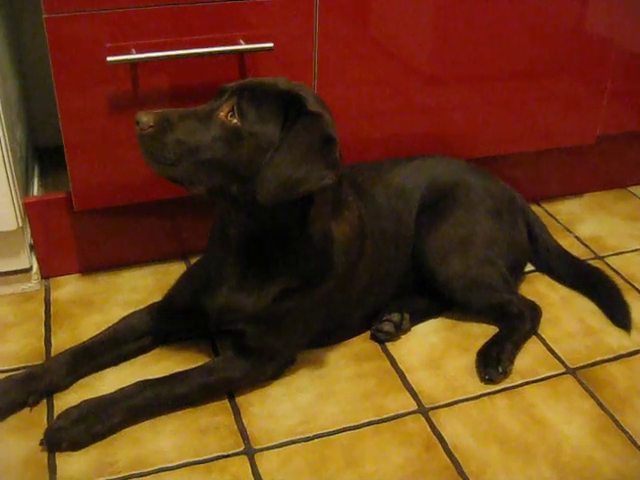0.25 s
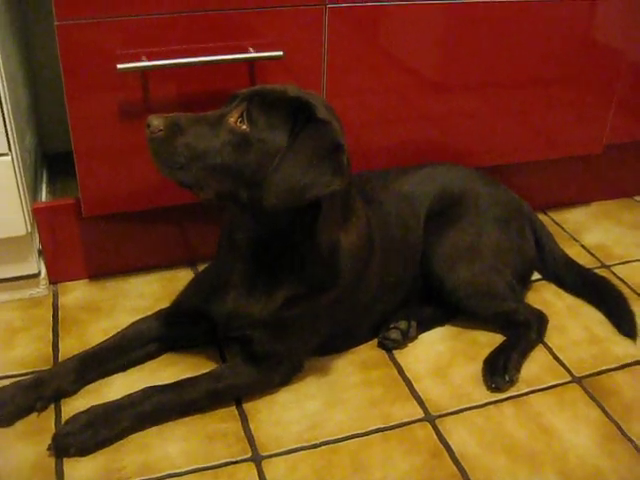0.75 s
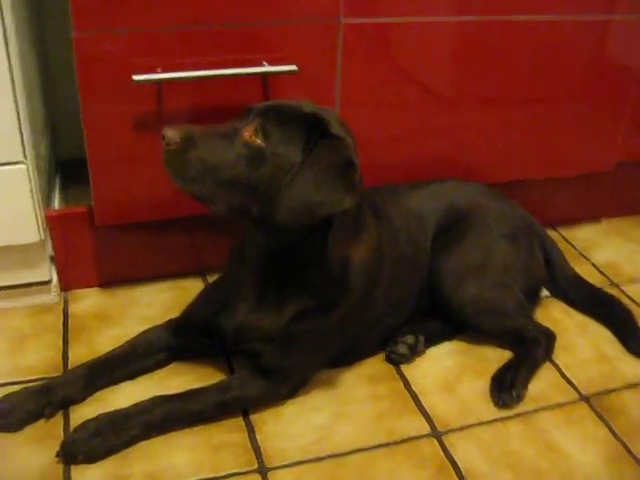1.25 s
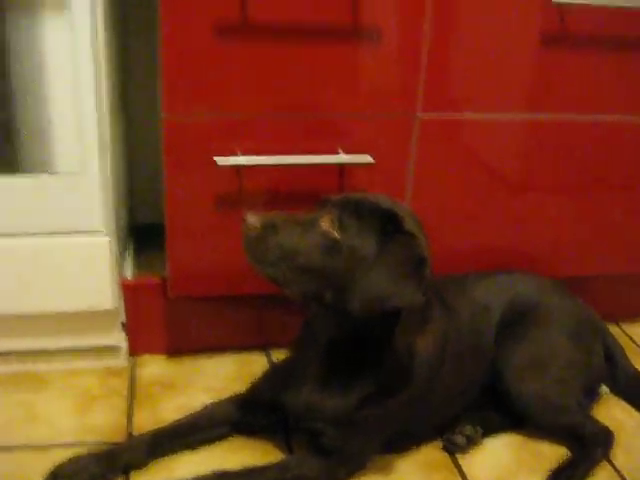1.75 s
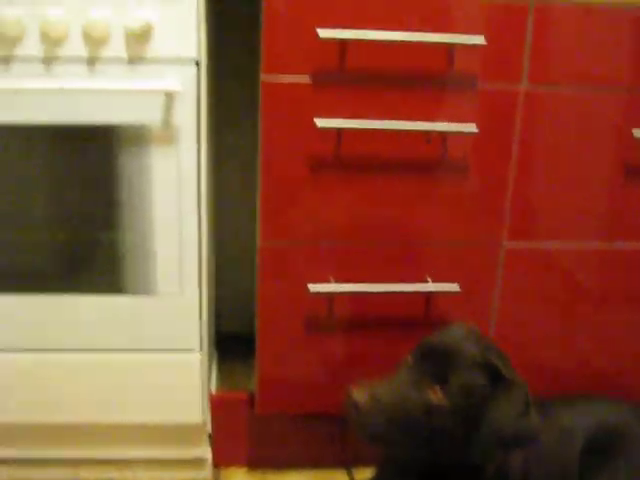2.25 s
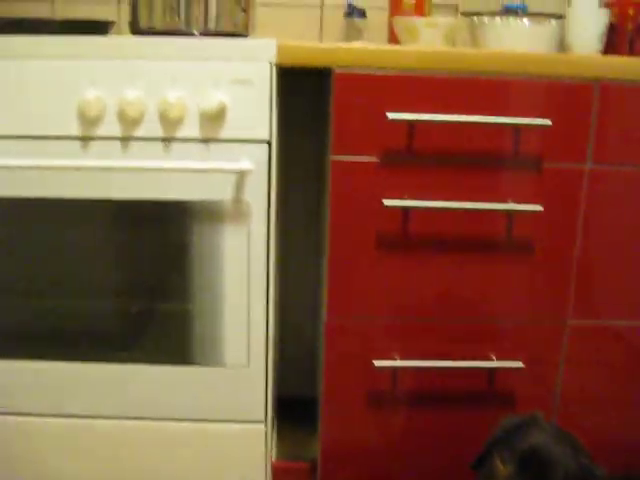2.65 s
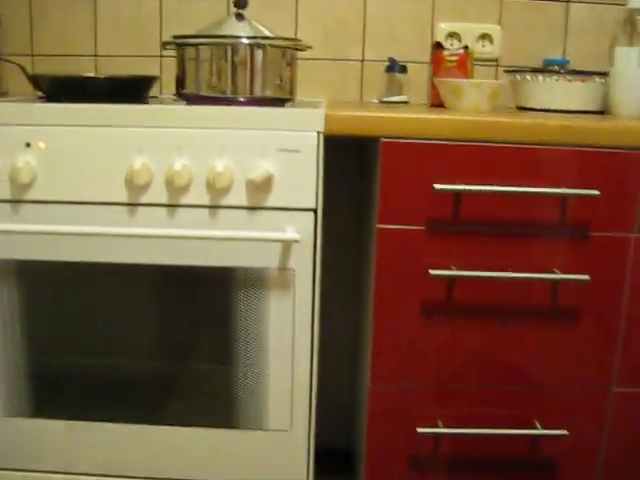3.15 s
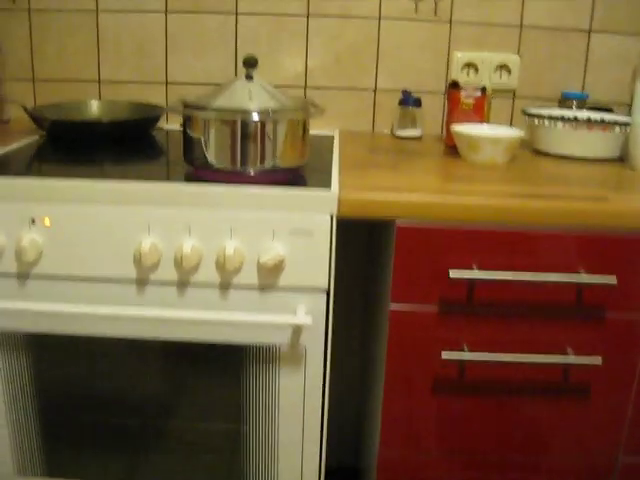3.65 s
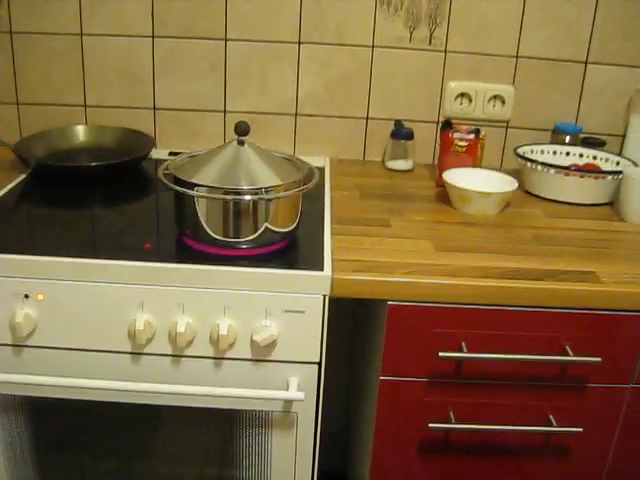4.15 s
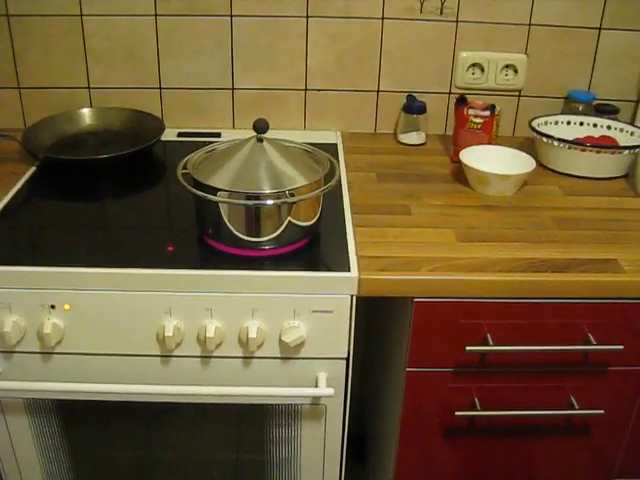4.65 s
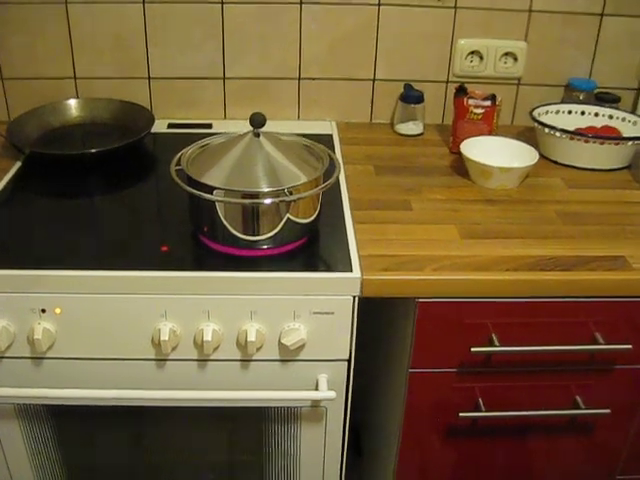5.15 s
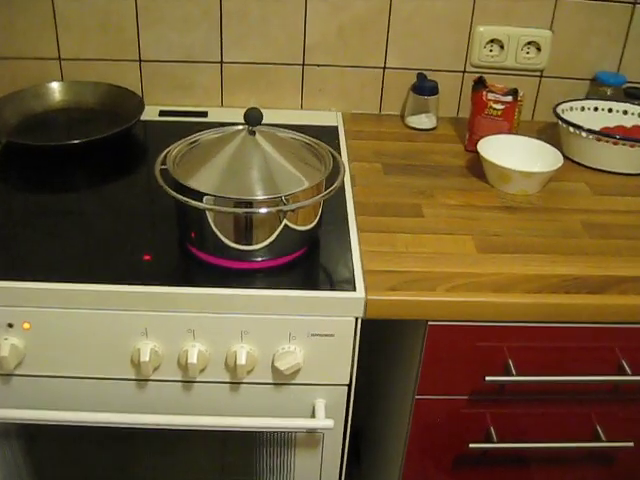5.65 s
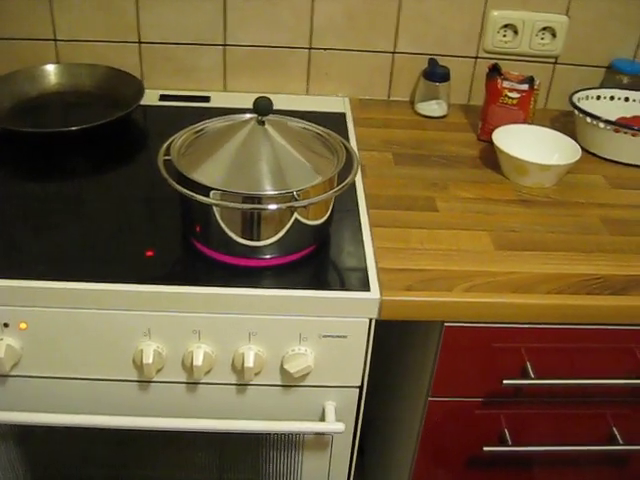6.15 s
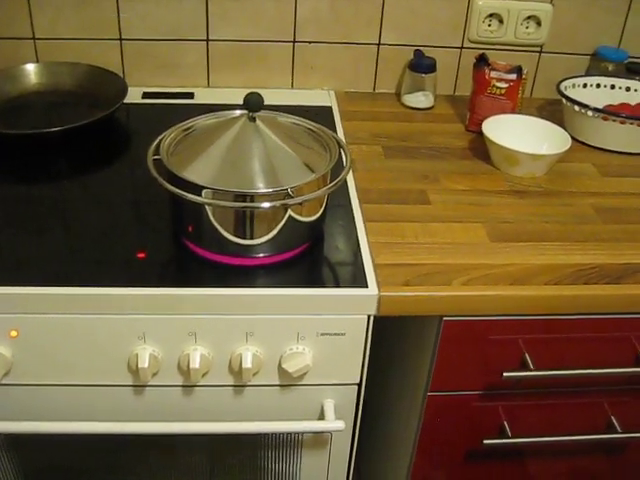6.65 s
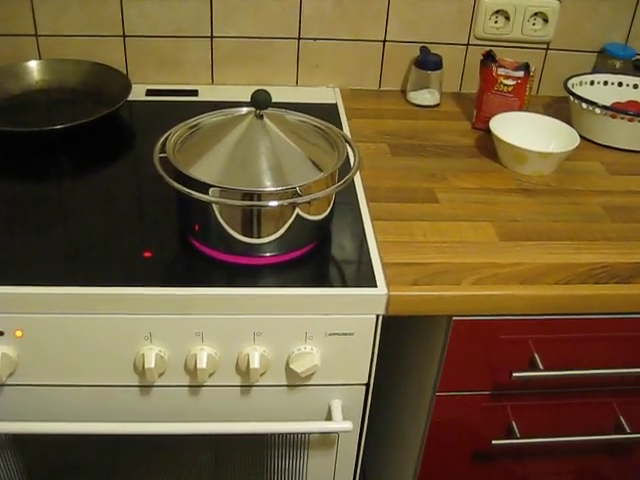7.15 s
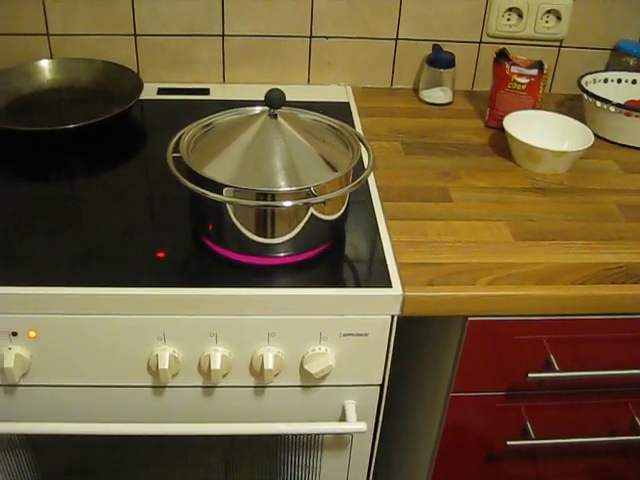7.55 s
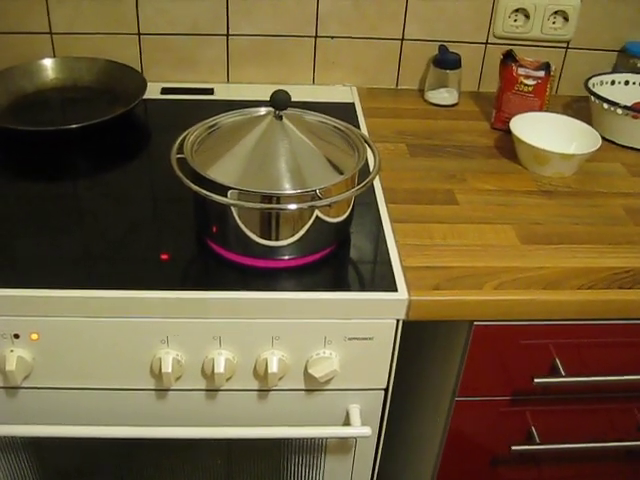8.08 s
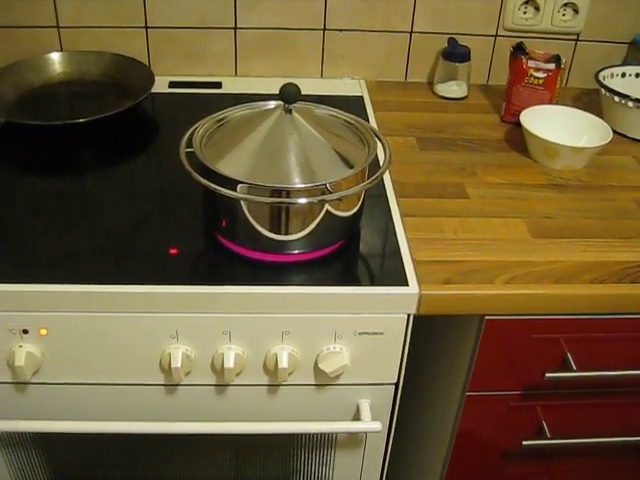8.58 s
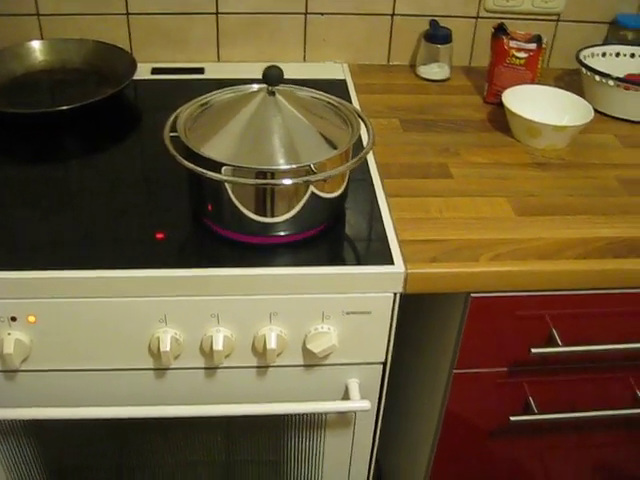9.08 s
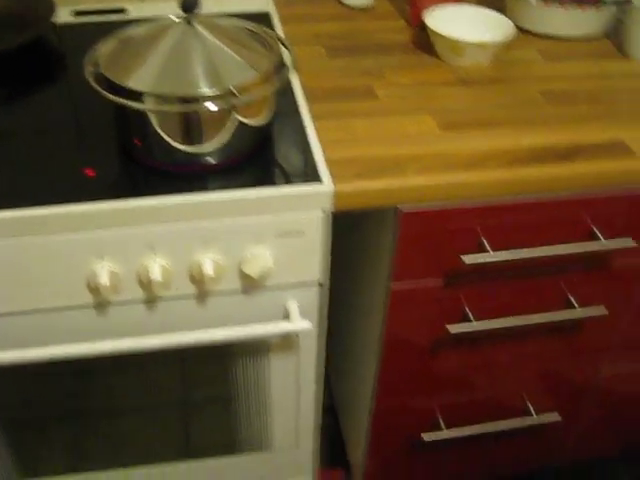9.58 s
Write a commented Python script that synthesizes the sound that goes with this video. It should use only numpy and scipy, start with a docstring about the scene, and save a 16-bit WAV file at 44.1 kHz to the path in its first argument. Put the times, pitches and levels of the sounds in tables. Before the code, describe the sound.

Muffled popping from a lidded metal pot in a small echoing kitchen, picked up by a modest handheld microphone with constant hiss. Early clusters are separated by quiet pauses; later the pops become frequent and irregular, some sharp and clinking against the lid, others soft and puffy. Kernels rattle briefly after the bursts, and fine sizzling swells slightly midway.

```python
"""Popcorn kernels burst in a covered steel pot in a tiled kitchen.
Each burst is a puff of banded noise and a knock of a few sine cycles on pot or lid.
Blows and bounces ring the steel as decaying modes, and some leave one mode singing.
Oil and stirring kernels crackle as random clicks; a dense noise tail makes the kitchen echo.
Shaped noise makes the hiss; the input stage rounds peaks and leaves a narrow gap in the treble."""
import sys
import numpy as np
from scipy import signal
from scipy.fft import rfft, irfft
from scipy.io import wavfile
from scipy.ndimage import uniform_filter1d

SR = 44100
rng = np.random.default_rng(int(sys.argv[2]) if len(sys.argv) > 2 else 0)


def put_to_file(sound):
    """Save the sound as 16-bit audio at rate SR, in the file named by the first command-line argument."""
    columns = np.atleast_2d(sound).T  # one column per channel
    safe = np.clip(columns, -1, 1)
    whole_steps = np.round(safe * 32767)
    wavfile.write(sys.argv[1], SR, whole_steps.astype(np.int16))


N = 433062  # length in samples

# All source levels below are relative, before the trims in the sources and the mix.
# bursts and blows: start_s, rise_s, knock_hz, knock_db, puff_db, brightness_db_per_octave, steam_db
BURSTS = [(0.104, .001, 1170, -29.5, -34.5, 1, -47), (0.106, .001, 1110, -33.5, -35.5, 8.5, -24.5),
          (0.17, .008, 5000, -48, -27.5, 4, -31), (0.209, .008, 5550, -55, -33.5, -3.5, -66),
          (1.071, .019, 2260, -46, -33.5, -1.5, -37.5), (1.093, .001, 1960, -39, -28, -2.5, -40.5),
          (1.125, .01, 1960, -38, -26.5, -2.5, -46), (1.2429, .013, 1880, -49, -28, 2, -27.5),
          (1.281, .006, 1580, -43, -34.5, -5, -50), (2.257, .02, 2400, -45, -31.5, 3, -26.5),
          (2.281, .001, 2450, -44, -43, 15, -50), (2.3012, .001, 4230, -24, -23.5, 5, -35),
          (2.329, .006, 3280, -37, -25.5, 7.5, -50), (2.38, .009, 3600, -48, -31.5, -2.5, -58),
          (2.449, .007, 3330, -48, -30, -1, -53), (2.712, .022, 4870, -31, -29.5, 0, -33),
          (2.9796, .001, 1110, -30, -28.5, -3.5, -52), (2.992, .03, 2920, -51, -24, 0.5, -27.5),
          (3.319, .002, 2410, -44, -51, -3, -67), (3.607, .001, 1070, -47, -41, -2, -53.5),
          (4.13, .001, 2600, -32.5, -30, -3.5, -55), (4.245, .001, 6400, -36.5, -34, -2.5, -40),
          (4.284, .001, 1440, -40, -32.5, -2, -58), (4.4298, .001, 2610, -49, -38, 1, -42.5),
          (4.58, .004, 3290, -29, -24.5, 3.5, -32.5), (4.623, .006, 4100, -24, -28.5, 2, -53),
          (4.8417, .001, 1510, -30, -28.5, -2, -37.5), (4.8645, .005, 3500, -44, -23.5, -0.5, -29),
          (4.91, .008, 3120, -20, -21.5, -1.5, -60), (5.228, .001, 3900, -36, -33, -2, -39),
          (5.2868, .001, 3890, -21, -22, 6, -29.5), (5.6722, .001, 2920, -50, -41, -2.5, -51),
          (5.756, .001, 2570, -22, -20.5, -2, -44.5), (5.767, .001, 2560, -33, -42, 4, -31),
          (5.802, .008, 1900, -44, -26, -2.5, -42), (5.837, .005, 1540, -39, -25.5, -1.5, -39),
          (5.894, .001, 3460, -31, -23, 1.5, -46), (5.952, .006, 3330, -30, -25.5, 9.5, -42),
          (6.0747, .001, 2870, -17.5, -22, -3.5, -59), (6.085, .001, 1815, -32, -54, -1, -37),
          (6.1315, .001, 3430, -27, -35, -2.5, -38), (6.333, .001, 3750, -47, -51, 9.5, -46.5),
          (6.4523, .001, 3090, -35.5, -42, 0, -59), (6.4712, .001, 1880, -37, -40, -0.5, -43.5),
          (6.504, .001, 2230, -35, -41.5, -3.5, -70), (6.6558, .001, 2450, -39, -48, -4, -62),
          (6.7172, .001, 3000, -44, -56, 1, -60), (6.9869, .001, 2170, -33, -24, -2.5, -37),
          (7.0909, .001, 3354, -23.5, -32, 0, -49), (7.224, .001, 2900, -37, -48, 1.5, -58),
          (7.27, .008, 2380, -56, -40, 2, -35.5), (7.2813, .001, 1305, -42, -30.5, 3.5, -50),
          (7.307, .001, 6100, -38, -47, 9, -33.5), (7.351, .001, 2100, -31, -37.5, 4, -50),
          (7.3986, .001, 3270, -27, -25, -3, -37), (7.462, .001, 3000, -28, -24.5, -2.5, -40),
          (7.4872, .005, 3600, -27, -20, 2.5, -42), (7.512, 0.00084, 3420, -47, -45, 5, -52),
          (7.558, .001, 3350, -29, -24, 2, -28), (7.666, .001, 3120, -19.5, -23, -1, -39),
          (7.6854, .001, 3300, -28, -37, 14, -37), (7.694, .001, 3380, -23, -36, 0, -30.5),
          (7.7235, .001, 3170, -30, -20.5, 6, -41), (7.7883, .006, 2670, -37, -21.5, -0.5, -33),
          (7.8393, .01, 3230, -44, -20.5, 1.5, -31), (8.102, .001, 2940, -46, -26.5, 3, -29),
          (8.145, .006, 2190, -37, -22, -2.5, -32), (8.5708, .001, 1366, -23.5, -25, -1, -34),
          (8.7, .001, 2350, -37, -38, -1, -35.5), (8.744, .001, 2940, -32.5, -31, -0.5, -42.5),
          (8.9465, .001, 2524, -20.5, -29, -1, -39), (8.97, .005, 2600, -33, -33.5, -3, -55),
          (9.019, .012, 2820, -41, -20.5, 0, -28.5), (9.3233, .001, 1995, -22.5, -24, -3.5, -45),
          (9.3352, .001, 3560, -17.5, -31.5, 17, -34), (9.3937, .007, 3570, -37, -19, 0.5, -38),
          (9.5099, .001, 3300, -29, -23.5, 3.5, -42.5)]
# bands of the puff, from thump to spit: low_hz, high_hz
BANDS_HZ = [(95, 420), (560, 1500), (1600, 2700), (2800, 4500), (4600, 7000), (9500, 16500)]
# how long the puff's noise lasts in each band: t60_s
PUFF_T60_S = [0.17, 0.054, 0.038, 0.035, 0.029, 0.16]
# pitches of the modes of pot and lid: pitch_hz
STEEL_HZ = [160, 250, 345, 640, 800, 1297, 1395, 1680, 1733, 1888, 1915, 2035, 2080, 2180, 2278, 2348, 2480,
            2557, 2667, 2718, 3004, 3131, 3272, 3335, 3396, 3447, 3608, 3720, 4072, 4264, 4414, 4560, 4980,
            5290, 5550, 6234]
# how strongly a blow drives each mode: level_db
STEEL_DB = [4.5, 4.5, -6.5, -5, -22.5, -2, -7.5, -13, -7, -22, -19, -18, -8.5, -17, -16, -14.5, -20, -7,
            -13, -30, -19, -6, -11.5, -7.5, -10, -18, -9, -32, -15, -7, -21, -8, -4, -8, -3, -6.5]
# how long each mode rings before any damping: t60_s
STEEL_T60_S = [.4, .55, .5, .6, .6, .45, .45, .6, .45, 1.25, .35, .8, .5, 1.5, .6, .5, .45, .5, 1.2, .45,
               .5, .55, .55, .6, .6, .65, .6, .5, .45, .35, 1.25, .45, .5, .4, .5, .36]
# blows that leave a mode singing: start_s, pitch_hz, level_db
SINGS = [(0.17, 4980, -43), (1.095, 1888, -34), (1.095, 1915, -22.5), (1.095, 1395, -32), (1.11, 1680, -32),
         (1.11, 2667, -39), (1.25, 2480, -49), (1.26, 1680, -33), (1.27, 640, -42.5), (2.31, 3335, -24),
         (2.31, 3608, -22), (2.31, 4560, -25), (2.31, 4264, -28), (2.31, 1733, -31), (2.32, 2080, -35),
         (2.31, 5290, -36), (4.6, 800, -47), (5.29, 3272, -21.5), (5.29, 3131, -29), (8.145, 250, -39),
         (9.51, 4072, -30), (9.51, 3396, -25), (9.51, 3608, -41), (6.99, 800, -46), (1.1, 2180, -47),
         (1.2423, 1888, -42), (2.28, 2557, -30), (2.3017, 3131, -25.5), (2.329, 4072, -26),
         (2.38, 3335, -41), (2.992, 3608, -47), (3.607, 2480, -45.5), (4.2846, 1395, -33.5),
         (4.582, 3447, -29.5), (4.8645, 3608, -27.5), (4.91, 2348, -39), (5.228, 3447, -38),
         (5.2863, 2667, -35), (5.7558, 2480, -43), (5.801, 1888, -31.5), (5.837, 1395, -30.5),
         (5.894, 2718, -34), (5.952, 3272, -25.5), (6.0745, 1297, -42), (6.084, 2480, -39),
         (6.46, 1297, -42), (6.9875, 3335, -28.5), (7.0906, 3447, -26.5), (7.2813, 1297, -38),
         (7.3985, 1297, -31.5), (7.463, 3335, -43), (7.4874, 2667, -33.5), (7.558, 1888, -32.5),
         (7.6854, 3396, -33), (7.7239, 3335, -27), (7.8396, 2348, -25.5), (8.145, 2348, -26.5),
         (8.5701, 1297, -27), (8.743, 3335, -37.5), (8.949, 250, -38.5), (9.0274, 3131, -52),
         (9.3352, 4560, -24), (9.3944, 2667, -32), (9.5098, 4414, -35.5)]
# decay of the kitchen's echoes: band_hz, t60_s
KITCHEN_DECAY = [(150, 0.2), (400, 0.59), (1000, 0.73), (2800, 0.62), (7000, 0.54), (11000, 0.22),
                 (16000, 0.26)]
# colour of room tone and microphone noise: band_hz, relative_db_per_hz
HISS_COLOUR = [(15, -23), (25, -9), (161, -7), (200, -4), (301, -6), (516, -5.5), (754, -8), (818, -7.5),
               (1790, -11.5), (5570, -10), (7710, -19.5), (9070, -11.5), (16000, -11.5)]
# oil and stirring kernels over time: time_s, level_db
SIZZLE_LEVEL = [(0, -59), (2, -58.5), (3.5, -54.5), (5, -50), (7, -54), (9.8, -57)]

HISS_DB = -49.5  # rms level in the mix
GAP_HZ, GAP_WIDTH_HZ, EDGE_HZ = 7873, 820.0, 15850  # treble gap and upper band limit
# the puff falls off per squared octave from the middle and leans to the knock's pitch
MIDDLE_HZ, ARCH_DB, FOCUS_DB, FOCUS_OCTAVES = 2800, 4.0, 3, 0.24
# the steam thumps as well as spits, less so in a bright burst
THUMP_DB, THUMP_PER_BRIGHT = -10.5, -2.5


def amp(db):
    """Decibels to gain."""
    return 10 ** (np.asarray(db) / 20)


def evened(x):
    """Scales to rms 1."""
    return x / np.sqrt(np.mean(x ** 2) + 1e-20)


def read(points, hz):
    """Reads a spectrum table on a log frequency axis."""
    f, value = np.transpose(points)
    return np.interp(np.log(hz + 1), np.log(f + 1), value)


def band(x, lo_hz, hi_hz):
    """Keeps the sound between two frequencies."""
    sos = signal.butter(3, [lo_hz, hi_hz], "band", fs=SR, output="sos")
    return signal.sosfilt(sos, x)


def add(mix, start_s, sound):
    """Mixes a sound in at its start time, cut at the end of the mix."""
    at = round(start_s * SR)
    part = mix[..., at:at + sound.shape[-1]]
    part += sound[..., :part.shape[-1]]


def hiss():
    """Steady room tone and microphone noise: white noise shaped by its spectrum."""
    hz = np.fft.rfftfreq(N, 1 / SR)
    spectrum = rfft(rng.standard_normal(N)) * amp(read(HISS_COLOUR, hz))
    return amp(HISS_DB) * evened(irfft(spectrum, N))


def sizzle(per_s=700, spread_db=3.0):
    """Tiny crackles of hot oil and faint kernel ticks on the pot floor: random band-passed clicks."""
    size = amp(spread_db * rng.exponential(1, N))
    happens = rng.random(N) < per_s / SR
    clicks = size * happens * rng.standard_normal(N)
    level_db = np.interp(np.arange(N) / SR, *np.transpose(SIZZLE_LEVEL))
    return amp(level_db) * evened(band(clicks, 960.0, 5500.0))


def kitchen(x, first_s=0.0056, build_s=0.0061):
    """Dense echoes that build up quickly, each band dying at its own speed."""
    hz, t, z = signal.stft(rng.standard_normal(SR), SR, nperseg=256)
    decay = amp(-60 * t / read(KITCHEN_DECAY, hz)[:, None])
    tail = signal.istft(z * decay, SR, nperseg=256)[1]
    since_first = np.maximum(np.arange(len(tail)) / SR - first_s, 0)
    tail = tail * (1 - np.exp(-since_first / build_s))
    return signal.fftconvolve(x, tail / np.linalg.norm(tail))[:N]


def colours():
    """Level of every burst in each band (dB), bands x bursts."""
    s, rise, knock_hz, knock_db, puff_db, bright, steam_db = np.transpose(BURSTS)
    hz = np.mean(BANDS_HZ[1:-1], 1)[:, None]
    octaves = np.log2(hz / MIDDLE_HZ)
    focus = FOCUS_DB * np.exp(-(np.log2(hz / knock_hz) / FOCUS_OCTAVES) ** 2)
    body = puff_db + bright * octaves - ARCH_DB * octaves ** 2 + focus
    thump = steam_db + THUMP_DB + THUMP_PER_BRIGHT * bright
    return np.vstack([thump, body, steam_db])


def puffs(snap_db=-5.5, spit_snap_db=-0.5, snap_t60_s=0.012, spit_snap_t60_s=0.048, grain_db=3.0):
    """Steam bursts the husk: a snap, then a grainy noise that dies fast, at its own level in each band."""
    t = np.arange(SR // 2) / SR
    envelopes = np.zeros((len(BANDS_HZ), N))
    snaps = np.array([(snap_db, snap_t60_s)] * (len(BANDS_HZ) - 1) + [(spit_snap_db, spit_snap_t60_s)])
    snap = amp(snaps[:, :1] - 60 * t / snaps[:, 1:])
    fading = amp(-60 * t / np.array(PUFF_T60_S)[:, None])
    for (s, rise, *rest), puff_db in zip(BURSTS, colours().T):
        opening = np.minimum(t / max(rise, 1e-4), 1)  # a slow rise hides the snap
        add(envelopes, s, amp(puff_db)[:, None] * (fading + snap) * opening)
    grain = amp(grain_db * evened(uniform_filter1d(rng.standard_normal(N), size=60)))
    noise = envelopes * grain * rng.standard_normal(envelopes.shape)
    out = np.zeros(N)
    for x, (lo, hi) in zip(noise, BANDS_HZ):
        out += band(x, lo, hi) * np.sqrt(SR / 2 / (hi - lo))  # makes up for the width of the band
    return amp(-2.5) * out


def knocks(t60_s=0.034, partner=0.71, partner_db=-15.0):
    """The husk cracks or the kernel strikes the wall: a few cycles around one pitch."""
    t, out = np.arange(SR // 10) / SR, np.zeros(N)
    for (s, rise, hz, knock_db, *rest), phase in zip(BURSTS, rng.random((len(BURSTS), 2))):
        # weaker partners above and below the pitch
        pair = sum(np.sin(2 * np.pi * (hz * partner ** k * t + p)) for k, p in zip((-1, 1), phase))
        tone = np.sin(2 * np.pi * hz * t) + amp(partner_db) * pair
        opening = np.minimum(t / max(rise, 1e-4), 1)
        add(out, s, amp(knock_db - 60 * t / t60_s) * tone * opening)
    return amp(9.5) * out


def train(s, size):
    """Single clicks of given sizes at given times; late ones land on the last sample."""
    return np.bincount(np.clip(np.round(s * SR).astype(int), 0, N - 1), size, N)


def ring(clicks, hz, t60_s):
    """One mode: every click starts a dying sine of its own height."""
    r = 1000 ** (-1 / (t60_s * SR))
    w = 2 * np.pi * hz / SR
    return signal.lfilter([0, r * np.sin(w)], [1, -2 * r * np.cos(w), r * r], clicks)


def colour_at(hz, colour):
    """Level of a blow at one pitch, between the levels of its bands."""
    place = np.interp(np.log(hz), np.log(np.mean(BANDS_HZ, 1)), np.arange(len(BANDS_HZ)))
    place = min(place, len(BANDS_HZ) - 1.001)
    low, share = int(place), place % 1
    return (1 - share) * colour[low] + share * colour[low + 1]


def strike(modes, spread_db, count=4, bounce_db=-9.0, bounce_s=.04, smear_s=.003):
    """Each blow rings the modes by chance of where it lands; the flung kernel bounces a few more times."""
    (s, rise, *rest), colour = np.transpose(BURSTS), colours()
    chance = rng.standard_normal((len(s), len(modes), count + 1))
    # the modes do not all start together
    onset = rng.random(chance.shape) * (2 * rise + smear_s)[:, None, None]
    late = np.cumsum(2 * bounce_s * rng.random((len(s), count)), 1)
    at, out = s[:, None] + np.c_[0 * s, late], np.zeros(N)
    fall_db = bounce_db * np.arange(count + 1)
    for k, (hz, db, t60_s) in enumerate(modes):
        size = amp(colour_at(hz, colour)[:, None] + db + fall_db + spread_db * chance[:, k])
        sign = np.sign(chance[:, k - 1])
        clicks = train((at + onset[:, k]).ravel(), (size * sign).ravel())
        out += ring(clicks, hz, max(t60_s, .05))
    return out


def steel(split_hz=13., twin_db=-4.0, damped=.6, longest_s=.45):
    """The strong modes, damped by the corn; a round shell splits each into a close pair that beats."""
    table = zip(STEEL_HZ, STEEL_DB, STEEL_T60_S)
    modes = [(hz, db, min(damped * t60_s, longest_s)) for hz, db, t60_s in table]
    twins = [(hz + split_hz * rng.standard_normal(), db + twin_db, t60_s) for hz, db, t60_s in modes]
    return amp(-8.5) * strike(modes + twins, spread_db=3.5)


def clatter(count=110, base_t60_s=0.21, treble_base_t60_s=0.2, treble_db=-2.5):
    """The many weak, crowded modes of thin steel and the rim of the lid."""
    hz = np.exp(rng.uniform(np.log(550.), np.log(15000.), count))
    high = hz > BANDS_HZ[4][1]
    t60_s = np.where(high, treble_base_t60_s, base_t60_s) * rng.uniform(0.93, 0.94, count)
    return amp(-14.5) * strike(list(zip(hz, treble_db * high, t60_s)), spread_db=2.0)


def singing(least_split_hz=7.1, twin_db=-7.5, rise_s=0.0052, damped=0.98):
    """Some blows set one mode singing freely, louder and longer than the rest, with a beating twin."""
    t, out = np.arange(SR) / SR, np.zeros(N)
    for (s, hz, db), (phase, split) in zip(SINGS, rng.random((len(SINGS), 2))):
        k = np.argmin(abs(np.array(STEEL_HZ) - hz))
        turns = STEEL_HZ[k] * t
        twin_turns = turns + least_split_hz * (1 + split) * t + phase
        pair = np.sin(2 * np.pi * turns) + amp(twin_db) * np.sin(2 * np.pi * twin_turns)
        fading = amp(db - 60 * t / (damped * STEEL_T60_S[k]))
        add(out, s, fading * pair * np.minimum(t / rise_s, 1))
    return out


def scene():
    """The pot heard directly and through the kitchen, over the hiss; the deep bass is cut away."""
    puff, knock = puffs(), knocks()
    rings = steel() + clatter()
    oil, song = sizzle(), singing()
    sent = amp(2.0) * puff + amp(-6.0) * knock + amp(-9.5) * rings + amp(-10.5) * song + oil
    direct = puff + knock + rings + song + 0.27 * oil
    pot = band(direct + kitchen(sent), 107.0, 21000.0)
    return (pot + hiss())[None]


def record(dry, ceiling=.6):
    """The input stage rounds off the tallest peaks; a notch in the treble, then the band limit."""
    rounded = ceiling * np.tanh(dry / ceiling)
    notched = signal.lfilter(*signal.iirnotch(GAP_HZ, GAP_HZ / GAP_WIDTH_HZ, SR), rounded)
    low_pass = signal.firwin(511, EDGE_HZ, window=("kaiser", 9), fs=SR)
    return signal.oaconvolve(notched, low_pass[None], "same")


dry = scene()
out = record(dry)
put_to_file(out)
```